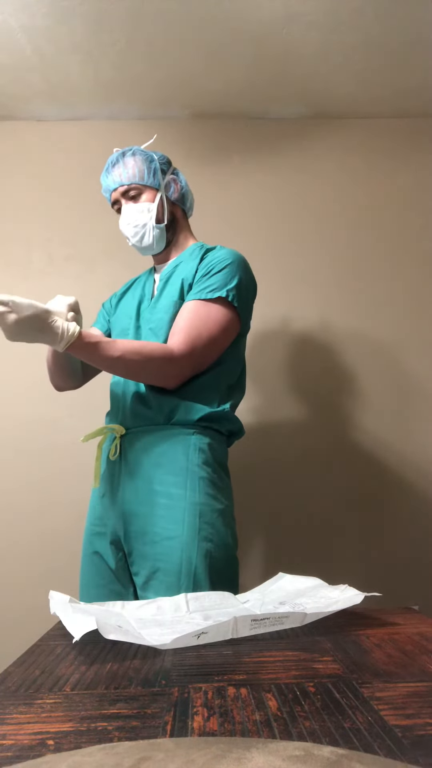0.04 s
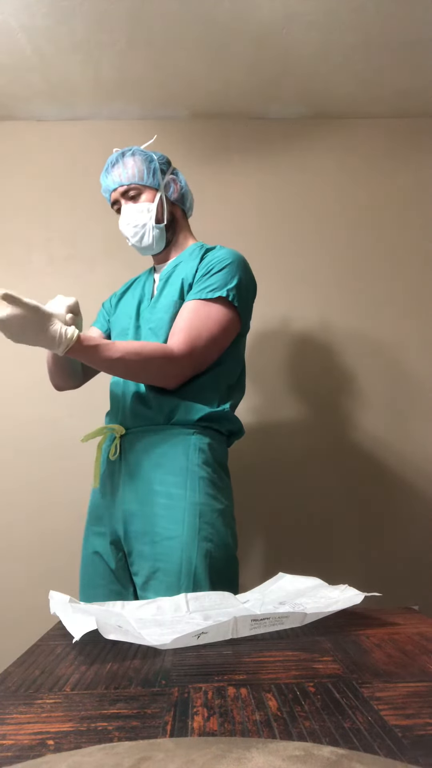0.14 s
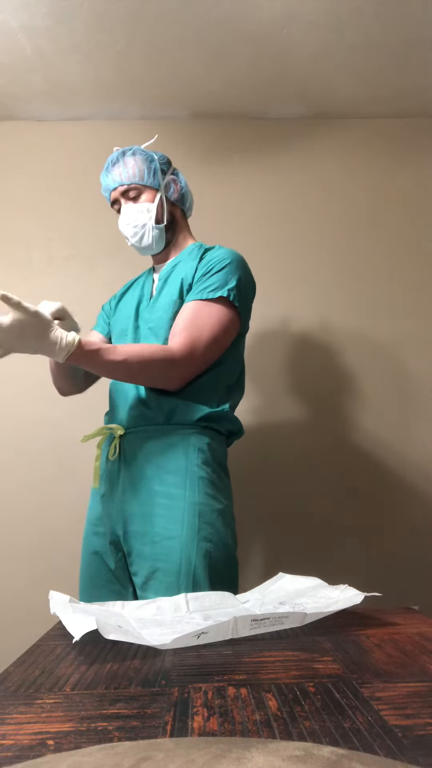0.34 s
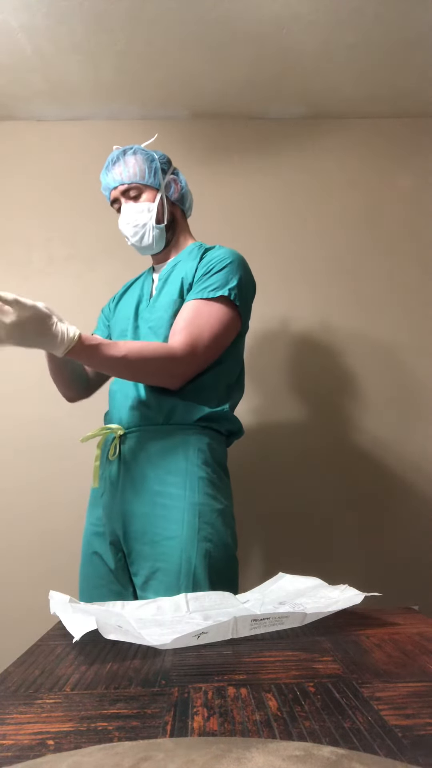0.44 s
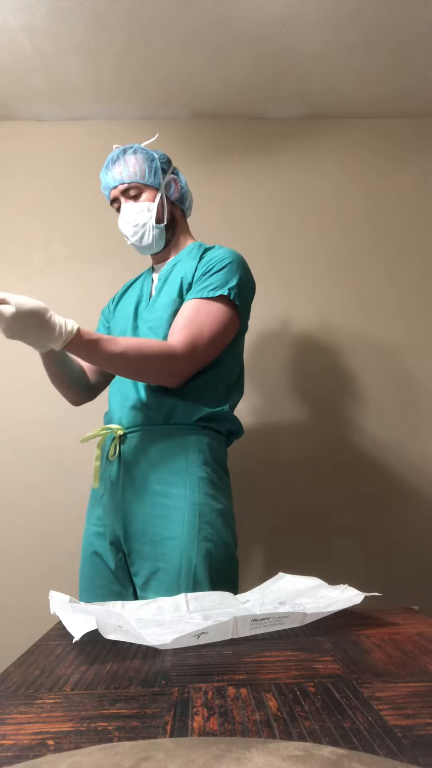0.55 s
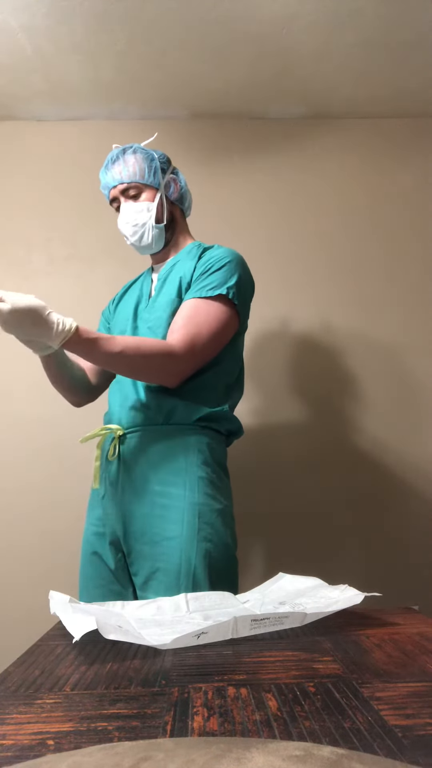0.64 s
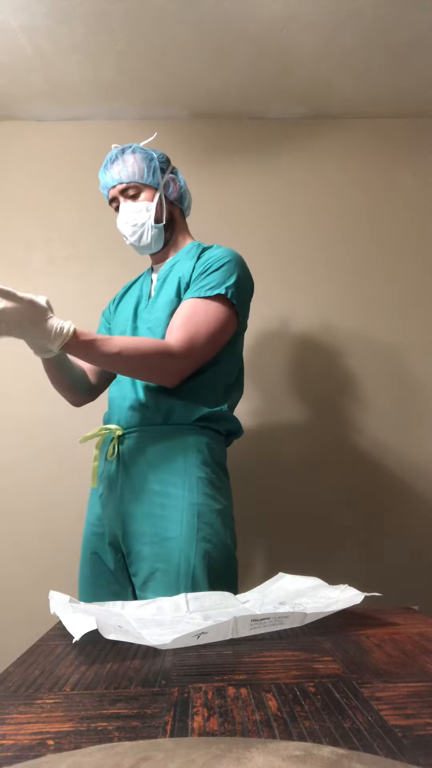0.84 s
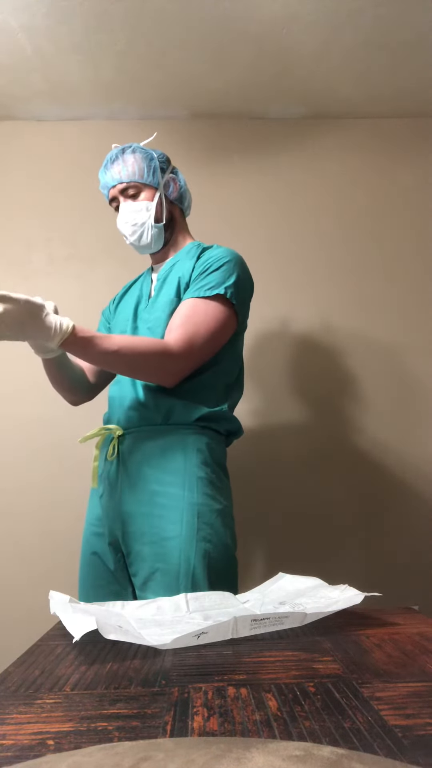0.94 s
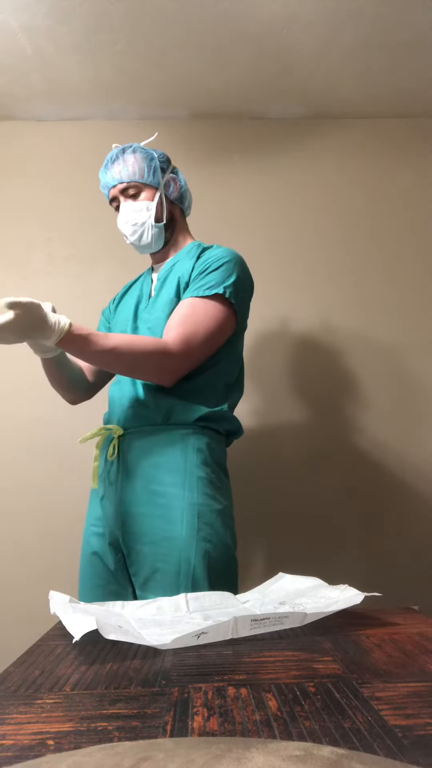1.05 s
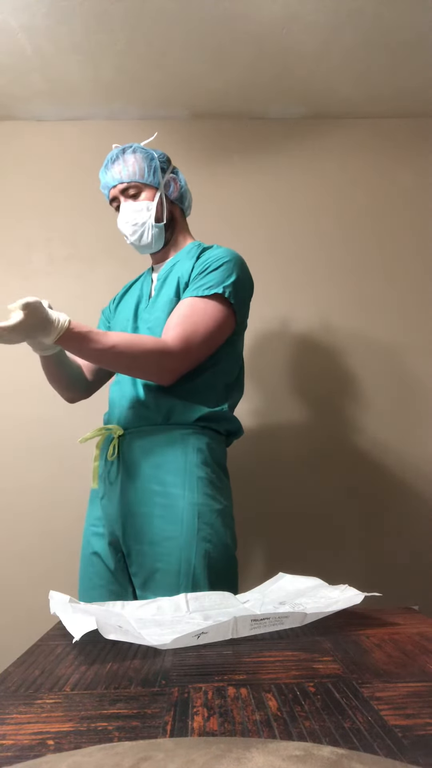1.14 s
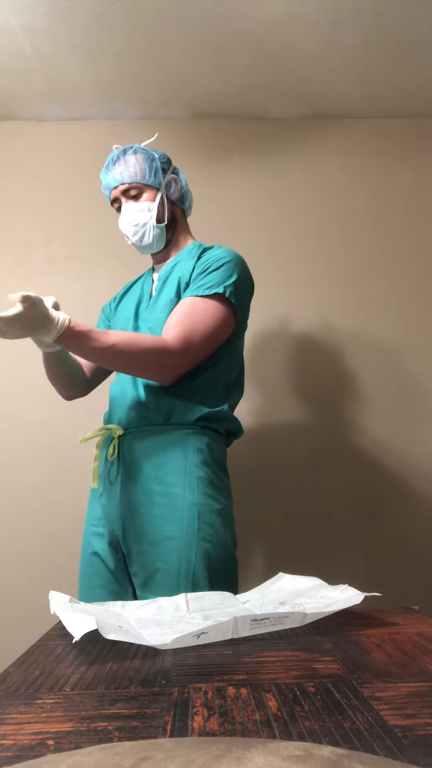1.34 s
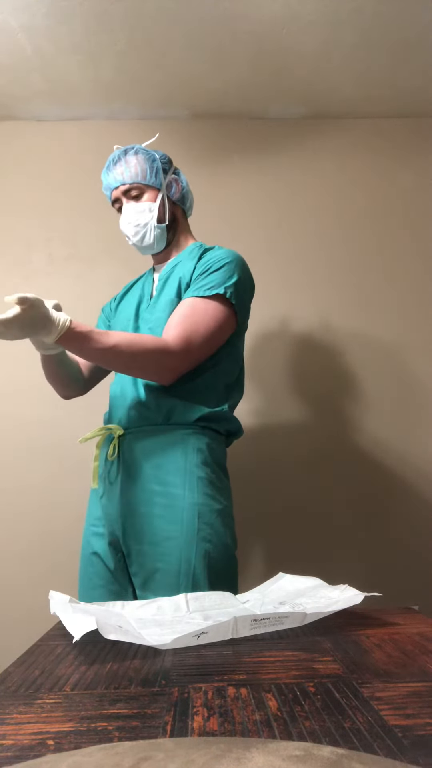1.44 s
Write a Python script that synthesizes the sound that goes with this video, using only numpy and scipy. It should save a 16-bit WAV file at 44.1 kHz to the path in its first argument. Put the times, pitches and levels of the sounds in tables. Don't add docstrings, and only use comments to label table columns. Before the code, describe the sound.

A latex glove cuff snaps in a small, bare room, heard by a phone about two metres away. Faint rubbing and dry ticks start at once, growing to sharper cracks around 0.1 to 0.23 seconds. The loudest slap on skin lands at 0.39, popping downward with a short bright echo. Soft rubbing and small ticks lead to a lighter snap at 0.83, then tiny ticks over faint ventilation hum.

```python
import sys
import numpy as np
from scipy import signal
from scipy.fft import rfft, irfft
from scipy.io import wavfile
from scipy.ndimage import uniform_filter1d

SR = 44100
rng = np.random.default_rng(int(sys.argv[2]) if len(sys.argv) > 2 else 0)


def store_wav(level_fs):
    pcm = np.round(np.clip(np.atleast_2d(level_fs), -1, 1) * 32767)
    wavfile.write(sys.argv[1], SR, pcm.T.astype(np.int16))


def undo_db(level):
    steps = np.asarray(level, float) / 20
    return 10 ** steps


N = 66150


def along(table, hz):
    table = np.array(table, float)
    return np.interp(np.log(np.maximum(hz, 1)), np.log(table[:, 0]), table[:, 1])


def colour(x, spectrum_db):
    hz = np.arange(len(x) // 2 + 1) * SR / len(x)
    y = irfft(rfft(x) * undo_db(along(spectrum_db, hz)), len(x))
    return y / np.sqrt(np.mean(y ** 2))


def walk(rate_hz):
    hold = int(SR / rate_hz)
    steps = np.repeat(rng.standard_normal(N // hold + 1), hold)
    drift = uniform_filter1d(uniform_filter1d(steps, hold), hold)[:N]
    return drift / drift.std()


def add(out, start_s, burst):
    i = max(int(start_s * SR), 0)
    out[i:i + len(burst)] += burst[:N - i]


def swell(t, length_s):
    u = 3 * t / length_s
    return (u * np.exp(1 - u)) ** 2


# (frequency [Hz], density [dB per Hz])
HUM_SPECTRUM = [(28, -37), (48, -8), (120, -7.5), (400, -11), (700, -15.5), (1600, -25.5), (4400, -26.5),
                (16000, -34.5)]


def hum():
    level_db = -67.5 + 0.27 * walk(5.16)
    return colour(rng.standard_normal(N), HUM_SPECTRUM) * undo_db(level_db)


# (frequency [Hz], time [s])
REVERB_TIME = [(150, .35), (500, 0.29), (1400, 0.45), (3700, 0.31), (9700, 0.28), (16000, 0.32)]
# (frequency [Hz], level [dB])
REVERB_COLOUR = [(150, 6.5), (400, 1.5), (1200, -2.5), (2500, 2), (4000, 1), (8000, -1.5), (16000, 1.5)]


def room():
    gap_s, fill_s = 0.00035, 0.0065
    clump_db, clumps_per_s, smooth_s = 4, 500, .08
    t = np.arange(SR) / SR
    hz = np.maximum(np.arange(SR // 2 + 1.), 1)
    tail = 0
    for centre_hz in 125 * 2 ** np.arange(0, 7.1, .5):
        band_gain = np.exp(-(np.log2(hz / centre_hz) / .3) ** 2)
        band = irfft(rfft(rng.standard_normal(SR)) * band_gain, SR)
        decay_db = along(REVERB_COLOUR, centre_hz) - 60 * t / along(REVERB_TIME, centre_hz)
        tail = tail + band * undo_db(decay_db)
    tail = tail * (1 - np.exp(-np.maximum(t - gap_s, 0) / fill_s))
    tail = tail * undo_db(clump_db * np.exp(-t / smooth_s) * walk(clumps_per_s)[:SR])
    return tail / np.sqrt(np.sum(tail ** 2))


# (delay [s], level [dB])
REFLECTIONS = [(.0050, -8), (.0057, -14), (.0084, -10), (.0093, -14), (.0125, -15), (.0195, -14)]


def echoes():
    ir = np.zeros(2048)
    ir[0] = 1
    for delay_s, db in REFLECTIONS:
        ir[int(delay_s * SR)] = -undo_db(db)
    return ir


# (time [s], level [dB])
RUB_LEVEL = [(0, -60.5), (.09, -63.5), (.2, -60), (.3, -60), (.38, -63.5), (.55, -62), (.64, -64),
             (0.674, -57), (.74, -62), (.785, -64.5), (0.816, -55), (0.902, -60.5), (1.0, -79),
             (1.101, -69), (1.25, -103), (1.41, -88)]
# (frequency [Hz], density [dB per Hz])
RUB_SPECTRUM = [(150, -27), (400, -0.5), (600, -1.5), (1400, -4), (3600, -3.5), (7500, -13), (9000, -20),
                (16000, -25)]


def rubbing():
    clicks_per_s, spread_db = 4000, 1.8
    chance = rng.random((3, N))
    slips = chance[0] < clicks_per_s / SR
    strength = undo_db(-spread_db * np.log(chance[2] + 1e-9))
    clicks = slips * np.sign(chance[1] - .5) * strength
    time_s, db = np.array(RUB_LEVEL).T
    level_db = np.interp(np.arange(N) / SR, time_s, db) + 1.5 * walk(40)
    return colour(clicks, RUB_SPECTRUM) * undo_db(level_db)


# (time [s], skin thud [dB], flap [dB], film crack [dB], air [dB])
SIDE_ENERGY = [
    (.002, -64.5, -76, -67, -67),
    (.109, -63, -61, -57.5, -68),
    (0.166, -65.5, -60.5, -60.5, -84),
    (.21, -54, -51, -50, -58),
    (.391, -40.5, -42.5, -37.5, -42.5),
    (.423, -56, -55, -48, -41.5),
    (.826, -55.5, -53.5, -54, -62),
]
# (centre [Hz], width [octaves])
SIDE_BANDS = [(420, 1), (1700, 1), (3900, 0.59), (8500, 0.71)]


def thrown():
    out = np.zeros(N)
    hz = np.arange(257) * SR / 512 + 1
    bands = np.array([np.exp(-(np.log2(hz / centre_hz) / octaves) ** 2) for centre_hz, octaves in SIDE_BANDS])
    bands = bands / np.sqrt(np.mean(bands ** 2, axis=1, keepdims=True))
    for start_s, *band_db in SIDE_ENERGY:
        spectrum = np.sqrt(undo_db(np.array(band_db)) ** 2 @ bands ** 2)
        add(out, start_s, np.roll(irfft(spectrum), 64) * 30)
    return out


# (time [s], peak [dB], end pitch [Hz], length [cycles])
SKIN_SLAPS = [
    (.3907, -23.5, 590, 1.6),
    (.3913, -35, 380, 1.6),
    (1.317, -61, 170, 1.1),
]


def slaps():
    start_ratio, fall_s = 2.4, .0011
    out, t = np.zeros(N), np.arange(2048) / SR
    for start_s, db, hz, cycles in SKIN_SLAPS:
        glide_s = (start_ratio - 1) * fall_s * (1 - np.exp(-t / fall_s))
        pop = np.sin(2 * np.pi * hz * (t + glide_s))
        add(out, start_s, -undo_db(db) * swell(t, 1.7 * cycles / hz) * pop)
    return out


# (time [s], peak [dB], pitch [Hz], length [cycles],
# broad crack re peak [dB])
FILM_RELEASES = [(.0439, -45, 4300, 2.5, -10), (.1087, -42, 3400, 3.5, -5), (.1218, -45, 3700, 4.5, -3),
                 (.1643, -36, 3400, 2.6, -8), (.2099, -33, 5000, 2.6, -6), (.2100, -33, 7600, 4, -10),
                 (.3910, -23, 4100, 4.5, -4), (.3904, -36, 6500, 3, 2), (.4229, -31, 7600, 7, 1),
                 (.4234, -33, 10000, 7, 1), (.4238, -38, 13500, 8, 0), (.8259, -33, 3700, 3, -12),
                 (.8259, -50, 11500, 9, 0), (.8350, -52, 13000, 5, 0),
                 (.002, -49, 5250, 5.4, -5), (0.1044, -54, 3350, 4.2, -9), (0.214, -32.5, 5750, 2.8, -9),
              (0.2293, -35, 3100, 2, -4), (.6958, -51, 3700, 5.9, -19), (.7528, -45, 3750, 1, -8),
              (0.8515, -47, 3800, 2.5, -8), (.7958, -58, 7200, 5.3, -12), (1.0436, -56, 7500, 5, -26),
              (1.398, -59.5, 4200, 3.4, 0)]


def ticks():
    tail_db, tail_s = -12, .002
    out, t = np.zeros(N), np.arange(512) / SR
    rows = FILM_RELEASES
    spit = rng.standard_normal((len(rows), 513))
    spit = signal.lfilter([1, .6, -.7], [1], spit, axis=1)[:, 1:] / 3.5
    for (start_s, db, hz, cycles, crack_db), noise in zip(rows, spit):
        ring = swell(t, 1.6 * cycles / hz) * np.sin(2 * np.pi * hz * t)
        flutter = swell(t, cycles / hz) + undo_db(tail_db) * swell(t, 2 * tail_s)
        add(out, start_s, undo_db(db) * (ring + undo_db(crack_db) * noise * flutter))
    return out


def scene():
    glove = ticks() + slaps() + undo_db(-3.5) * rubbing()
    near = signal.fftconvolve(glove, echoes())[:N]
    diffuse = signal.fftconvolve(undo_db(-7.5) * glove + thrown(), room())[:N]
    return (near + diffuse + hum())[None]


def top_cut(x):
    return signal.sosfilt(signal.butter(12, 16430, fs=SR, output="sos"), x)


# (frequency [Hz], gain [dB])
MIC_RESPONSE = [(60, -5), (200, -3), (7500, 0.5), (9500, -2), (14000, -5), (16000, -7.5)]


def record(dry):
    hz = np.arange(N // 2 + 1) * SR / N
    dull = irfft(rfft(dry) * undo_db(along(MIC_RESPONSE, hz)), N)
    low_pass = signal.ellip(8, .2, 70, 16000, fs=SR, output="sos")
    return top_cut(signal.sosfilt(low_pass, dull))


dry = scene()
out = record(dry)
store_wav(out)
```